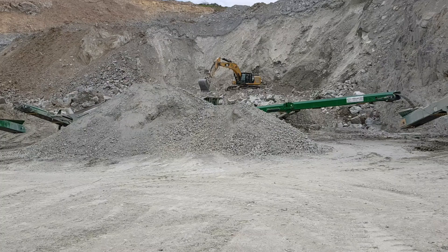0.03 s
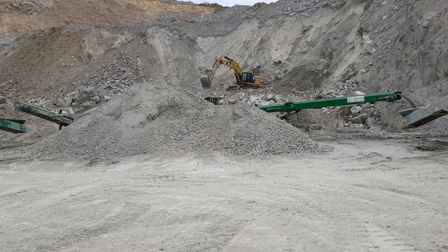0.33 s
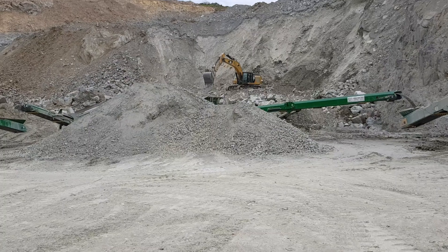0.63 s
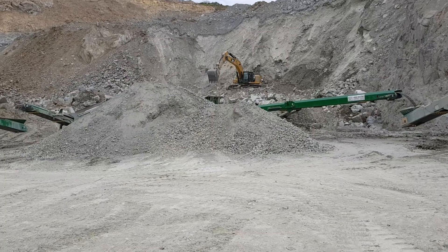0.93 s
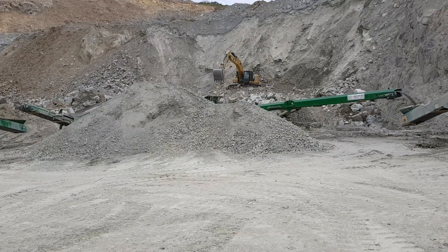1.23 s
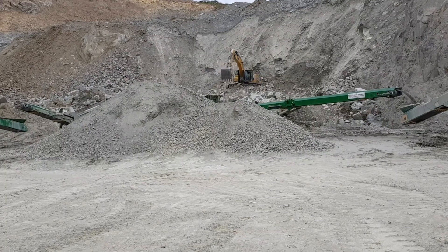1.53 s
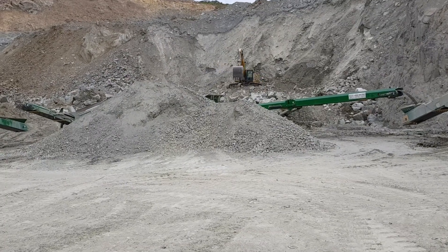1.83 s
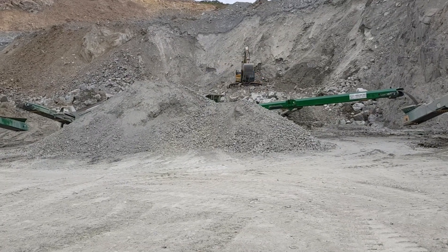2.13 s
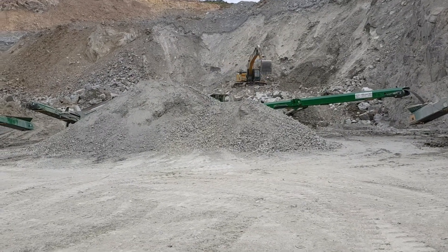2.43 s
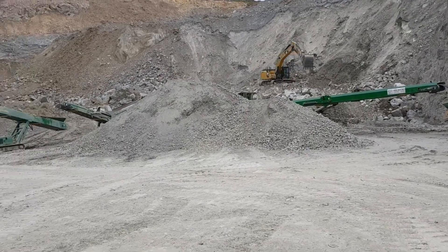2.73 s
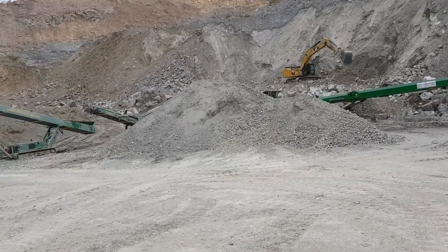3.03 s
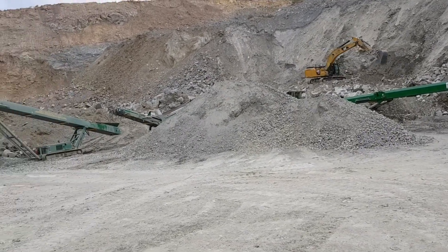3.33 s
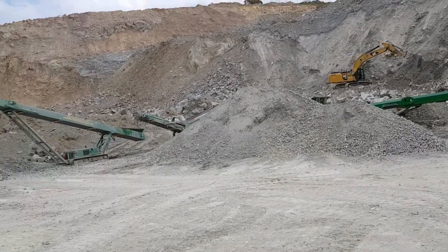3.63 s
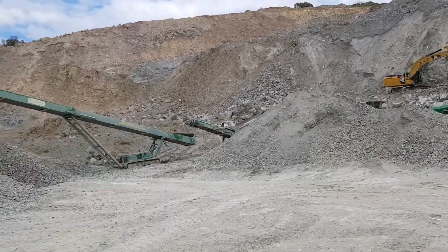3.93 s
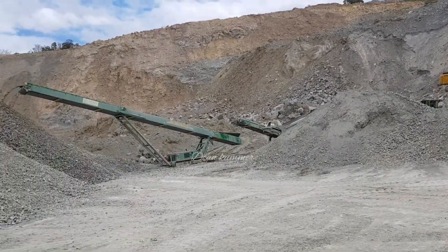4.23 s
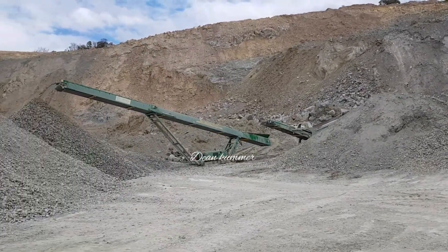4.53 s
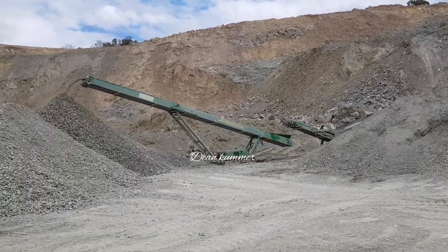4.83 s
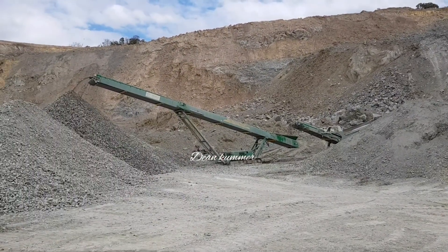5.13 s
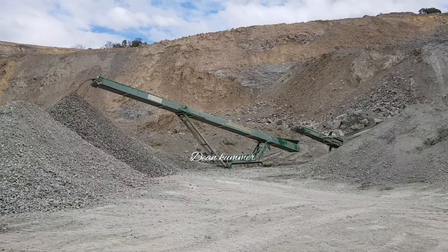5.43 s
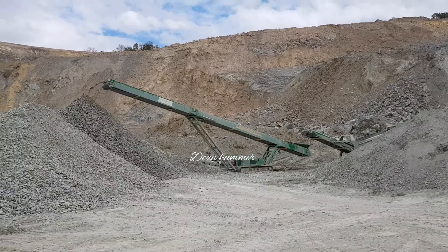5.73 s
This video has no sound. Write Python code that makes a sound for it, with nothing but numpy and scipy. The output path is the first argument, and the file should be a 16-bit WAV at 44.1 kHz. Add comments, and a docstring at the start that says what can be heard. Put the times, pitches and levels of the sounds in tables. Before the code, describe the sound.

Diesel engines drone and a rock crusher rumbles in an open quarry, with gravel rattling steadily and occasional stones knocking on steel.

```python
"""An open quarry, a crushing plant some way off to the right of a stereo pair. Three diesel engines beat
against each other, a crusher rumbles, shaking screens hum and toss gravel, and single stones knock on
steel; the pit walls scatter the noise of the rock. Midway the pair turns left: the plant drifts further
right, the gravel comes forward and a hollow churn recedes. An excavator growls under load through the
second half; near the end its pump whines briefly and two small ticks sound close to the microphones."""
import sys
import numpy as np
from scipy import signal
from scipy.fft import rfft, irfft, next_fast_len
from scipy.io import wavfile
from scipy.ndimage import map_coordinates

SR = 44100
rng = np.random.default_rng(int(sys.argv[2]) if len(sys.argv) > 2 else 0)


def dump_mix(stems):
    """Bounce the given channels to the path in sys.argv[1] as a 16-bit WAV at rate SR."""
    frames = np.atleast_2d(stems).T  # one column per channel
    limited = np.clip(frames, -1, 1)  # hard clip at full scale
    pcm = np.round(limited * 32767).astype(np.int16)
    wavfile.write(sys.argv[1], SR, pcm)


N = 254456


def engines(hunt_cycles=.015, flutter_db=.5):
    """Three distant exhausts at nearly the same speed drift in and out of step, so the drone throbs."""
    # the diesels: firing_hz, slowing_hz_per_s, in_step_s (when it fires together with the first)
    diesels = [(81.3, .052, 2.835), (84.08, .01, 2.825), (73.65, 0, 3.013)]
    # exhaust partials: multiple of the firing rate
    orders = [.75, 1, 1.25, 1.5, 1.75, 2, 2.5, 2.75, 3, 3.5, 4]
    # exhaust tone, a row per engine: level_db of each partial
    exhaust_db = [
        [-42, -21, -52, -41, -42, -31, -51, -60, -52, -57, -55],
        [-42, -25.8, -44, -48, -60, -27.6, -60, -53, -40.5, -52, -56],
        [-56, -31.5, -55, -44, -56, -35, -56, -65, -60, -65, -58],
    ]
    t, drone = np.arange(N) / SR, np.zeros(N)
    lead_hz = diesels[0][0]
    for (hz, slowing, in_step_s), levels in zip(diesels, exhaust_db):
        since = t - in_step_s
        firings = lead_hz * in_step_s + hz * since - slowing * since ** 2 / 2
        firings += hunt_cycles * wobble(1.36)
        for multiple, db in zip(orders, levels):
            level = amp(db + flutter_db * wobble(7))
            drone += np.sqrt(2) * level * np.sin(2 * np.pi * multiple * firings)
    return from_plant(drone)


def stones(shake_hz=14.7):
    """Rock roars and churns down chutes; gravel and grit rattle on the screens, landing twice a shake."""
    # spectrum of rock in the chutes: frequency_hz, level_db
    roar_spectrum = [(60, -80), (150, -17), (270, -3.5), (350, -2), (460, -1.5), (600, -3.5), (800, -4),
                     (950, -4), (1150, -7.5), (1500, -11.5), (2500, -59), (5000, -120)]
    # spectrum of the hollow churn: frequency_hz, level_db
    churn_spectrum = [(300, -60), (650, -16), (820, -2), (970, 0), (1150, -5.5), (1450, -13), (2200, -40),
                      (4000, -120)]
    # spectrum of gravel on the screens: frequency_hz, level_db
    gravel_spectrum = [(300, -90), (700, -53), (1150, -4), (1400, -2), (1650, 1), (1950, -2.5), (2400, -7),
                       (2900, -10), (3600, -18), (6000, -56), (10000, -120)]
    # spectrum of fine grit: frequency_hz, level_db
    grit_spectrum = [(800, -90), (2000, -8), (3000, -1), (3700, 1.5), (4800, -0.5), (5800, -1.5),
                     (6700, -10.5), (7500, -10.5), (8100, -9.5), (9200, -16), (10500, -16.5),
                     (12500, -17.5), (14500, -19.5), (15800, -30)]
    turn = turned()
    shake = 2 * np.pi * (shake_hz * np.arange(N) / SR + .04 * wobble(2))
    toss_db, landing_db = .55 * np.cos(shake), .8 * np.cos(2 * shake)
    rocks = tumbling(per_second=240, spread_db=1.8, t60_s=.04, grainy=.3)
    lumps = tumbling(per_second=240, spread_db=5, t60_s=.04, grainy=.3)
    pebbles = tumbling(per_second=340, spread_db=2.3, t60_s=.025, grainy=.4)
    chips = tumbling(per_second=600, spread_db=3, t60_s=.082, grainy=.35)
    # each gain in dB: steady flow + change as the pair turns + pulse of the screens
    roar = amp(-31.5 + .8 * turn + toss_db + landing_db / 2) * in_pit(rocks, roar_spectrum)
    churn = amp(-38.4 - 8 * turn + toss_db) * in_pit(lumps, churn_spectrum)
    gravel = amp(-34.5 + 1.67 * turn + landing_db) * in_pit(pebbles, gravel_spectrum)
    grit = amp(-40.5 - .7 * turn + landing_db / 2) * in_pit(chips, grit_spectrum)
    return roar + churn + gravel + grit


def tumbling(per_second, spread_db, t60_s, grainy):
    """Three paths of noise: many stone contacts, each a short burst, over a smooth bed of their echoes."""
    struck = rng.random(N) < per_second / SR
    size = np.minimum(rng.exponential(size=N), 5)
    contacts = struck * amp(spread_db * size) ** 2
    decay = amp(-60 * np.arange(SR // 8) / SR / t60_s) ** 2
    power = np.abs(signal.fftconvolve(contacts, decay)[:N])
    return rng.standard_normal((3, N)) * np.sqrt(1 - grainy + grainy * power / power.mean())


def crusher(level_db=-28.5, surge_db=1.8):
    """Rock breaking in the chamber sends a surging rumble across the pit."""
    # spectrum of the chamber's rumble: frequency_hz, level_db
    rumble_spectrum = [(15, -24), (30, -19), (42, -14), (55, -5), (85, -2), (112, -2), (135, -6),
                       (165, -11), (200, -10.5), (280, -19), (450, -45), (900, -120)]
    return amp(level_db + surge_db * wobble(6)) * in_pit(rng.standard_normal((3, N)), rumble_spectrum)


def decks(wander_cycles=.15, load_db=2):
    """The screen decks hum, unsteady under their changing load."""
    # tones of the decks and their drives: pitch_hz, level_db
    tones = [(47.7, -42), (58.4, -38), (88.9, -38), (95.2, -37.5), (111.7, -43), (176.5, -49), (233.7, -49),
             (261.5, -48), (301.5, -48), (353, -53), (377, -51), (488, -54), (956, -50)]
    t, hum = np.arange(N) / SR, np.zeros(N)
    for hz, db in tones:
        level = amp(db + load_db * wobble(3.96))
        cycles = hz * t + rng.random() + wander_cycles * wobble(1.985)
        hum += level * np.sin(2 * np.pi * cycles)
    return from_plant(np.sqrt(2) * hum)


def knocks(small_per_s=1.6, echo=.4):
    """Over at the plant, a few big stones stand out among smaller ones that fall at random."""
    # big stones hitting steel: start_s, level_db, t60_s, crack_db (against the ring)
    big_stones = [(2.9526, -27, 0.077, -2), (3.105, -27, 0.07, 3), (3.927, -24, .04, 3),
                  (5.1198, -21.5, .06, -2), (5.2555, -22.5, 0.11, -7), (5.352, -17.5, .026, -15)]
    track = np.zeros((2, N))
    for start_s, db, t60_s, crack_db in big_stones:
        add(track, start_s, amp(db) * knock(t60_s, crack_db, ring_hz=2410))
    for _ in range(round(small_per_s * N / SR)):
        db = -28.5 + 1.5 * rng.standard_normal()
        add(track, rng.random() * N / SR, amp(db) * knock(t60_s=.04, crack_db=-7, ring_hz=1900))
    straight, scattered = track
    return from_plant(straight) + echo * np.array([scattered, -scattered])


def knock(t60_s, crack_db, ring_hz, width_hz=300):
    """A stone strikes steel: a short rough ring and a crack, peak 1, as a straight and a scattered path."""
    # spectrum of the crack: frequency_hz, level_db
    crack_spectrum = [(200, -60), (700, -25), (2000, -2), (5000, 3.5), (6000, 5), (7500, -30), (15000, -40)]
    t = np.arange(SR // 6) / SR
    hz = np.fft.rfftfreq(len(t), 1 / SR)
    noise = rfft(rng.standard_normal((2, len(t))))
    ring = irfft(noise / (1 + (2 * (hz - ring_hz) / width_hz) ** 2), len(t))
    crack = irfft(noise * amp(along(crack_spectrum, hz)), len(t))
    fade = amp(-60 * t / t60_s) * (1 - np.exp(-t / .0008))
    blow = unit(ring * fade) + amp(crack_db) * unit(crack * fade)
    return blow / np.abs(blow).max(axis=1, keepdims=True)


def excavator(level_db=-38.5):
    """Out in the pit, the excavator growls as it takes up load."""
    # spectrum of the growl: frequency_hz, level_db
    growl_spectrum = [(150, -60), (250, -9), (310, -3), (380, -2), (450, -7.5), (600, -20), (1200, -70),
                      (2500, -120)]
    level = amp(level_db) * spell(start_s=2.52, length_s=2.87, fade_s=.3)
    return level * in_pit(rng.standard_normal((3, N)), growl_spectrum)


def pump(start_s=4.2, pitch_hz=447, rise_hz_per_s=12, waver_hz=3, level_db=-38, flutter_db=2):
    """The excavator's hydraulic pump whines briefly under load, creeping up in pitch."""
    hz = pitch_hz + rise_hz_per_s * (np.arange(N) / SR - start_s) + waver_hz * wobble(14)
    level = amp(level_db + flutter_db * wobble(12)) * spell(start_s, length_s=1, fade_s=.15)
    return from_plant(np.sqrt(2) * level * np.sin(2 * np.pi * np.cumsum(hz) / SR))


def ticks(gain_db=-6):
    """Two thin, dry ticks right at the microphones."""
    # close ticks: start_s, level_db (before gain and tone), t60_s
    bursts = [(5.2165, -17.5, 0.017), (5.4232, -27, 0.0028)]
    # their bright tone: frequency_hz, gain_db
    tone = [(1500, -12), (5500, -7), (8200, 8), (10000, 3.5), (14000, 6.5), (15800, -5)]
    t, track = np.arange(SR // 20) / SR, np.zeros((2, N))
    for start_s, db, t60_s in bursts:
        add(track, start_s, amp(db + gain_db - 60 * t / t60_s) * rng.standard_normal((2, len(t))))
    return filtered(track, lambda hz: amp(along(tone, hz)))


def in_pit(paths, spectrum, crossing_s=.00034):
    """Three unrelated paths reach the pair as stereo of rms 1: one straight, two scattered by the walls."""
    # sound arriving straight: frequency_hz, share_of_power
    direct_share = [(100, 0.033), (500, 0.36), (950, 0.64), (1600, 0.6), (2100, 0.33), (4000, 0.12),
                    (8000, .08)]

    def response(hz):
        direct = along(direct_share, hz)
        alike = np.sinc(2 * hz * crossing_s)  # long waves reach both microphones alike
        shares = [direct, (1 - direct) * (1 + alike) / 2, (1 - direct) * (1 - alike) / 2]
        return amp(along(spectrum, hz)) * np.sqrt(shares)

    straight, mid, side = filtered(paths, response)
    return unit(from_plant(straight) + np.array([mid + side, mid - side]))


def from_plant(x, before_ms=.36, after_ms=.44):
    """The straight path reaches the right microphone first, the more so after the turn."""
    lag = (before_ms + (after_ms - before_ms) * turned()) * SR / 1000
    return np.array([map_coordinates(x, [np.arange(N) + side * lag / 2], order=3) for side in (-1, 1)])


def turned(start_s=2.6, length_s=2.6):
    """How far the pair has turned left, 0 to 1, easing in and out."""
    progress = np.clip((np.arange(N) / SR - start_s) / length_s, 0, 1)
    return (1 - np.cos(np.pi * progress)) / 2


def spell(start_s, length_s, fade_s):
    """A gain that fades in, holds and fades out."""
    t = np.arange(N) / SR - start_s
    return np.clip(np.minimum(t, length_s - t) / fade_s, 0, 1)


def amp(db):
    """Decibels to gain."""
    return 10 ** (np.asarray(db) / 20)


def unit(x):
    """Scale to rms 1."""
    return x / np.sqrt(np.mean(x ** 2) + 1e-20)


def along(points, hz):
    """Interpolate (frequency_hz, value) points on a log frequency axis."""
    frequencies, values = np.transpose(points)
    return np.interp(np.log(hz + 1), np.log(frequencies + 1), values)


def wobble(rate):
    """A smooth random curve, rate knots a second."""
    return map_coordinates(rng.standard_normal(int(N * rate / SR) + 4), [np.arange(N) * rate / SR])


def filtered(x, response):
    """Filter x by a gain that is a function of frequency."""
    size = next_fast_len(N + SR // 4)
    return irfft(rfft(x, size) * response(np.fft.rfftfreq(size, 1 / SR)), size)[..., :N]


def add(track, start_s, sound):
    """Mix a short sound in at start_s."""
    part = track[..., round(start_s * SR):][..., :sound.shape[-1]]
    part += sound[..., :part.shape[-1]]


def scene():
    """The plant lies to the right, so the left microphone hears it shaded in the treble."""
    # shading across the pair: frequency_hz, left_minus_right_db
    shadow = [(300, 0), (900, -1), (1300, -1.5), (1700, -3.5), (2500, -1.5), (4000, -4), (5700, -6.5),
              (7000, -4), (8200, -8), (10500, -3), (13000, -7)]
    near = ticks()
    plant = engines() + decks() + crusher() + stones() + excavator() + pump() + knocks()
    return filtered(plant, lambda hz: amp(np.outer([.5, -.5], along(shadow, hz)))) + near


def record(dry, open_s=.073, top_hz=15800):
    """The microphones open after a moment and pass nothing above their band limit."""
    opened = np.clip((np.arange(N) / SR - open_s) / .004, 0, 1)
    return filtered(dry * opened, lambda hz: hz < top_hz)


dry = scene()
out = record(dry)
dump_mix(out)
```